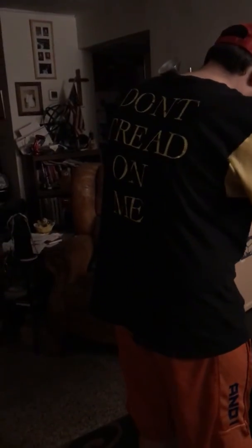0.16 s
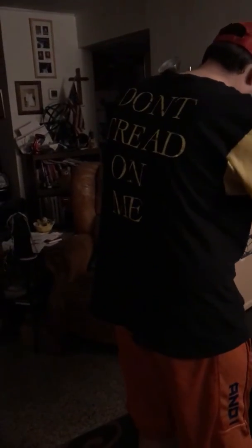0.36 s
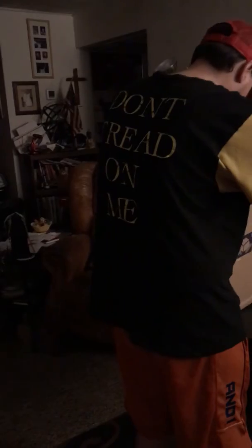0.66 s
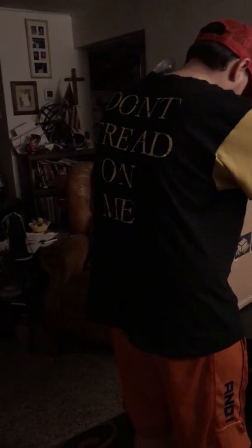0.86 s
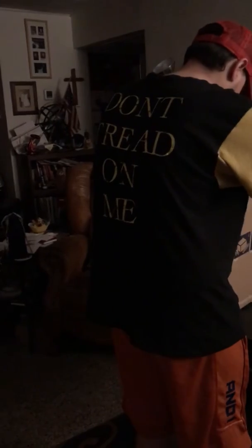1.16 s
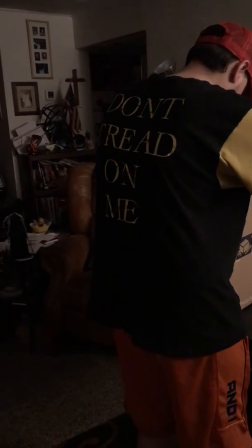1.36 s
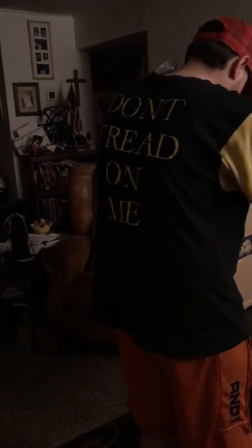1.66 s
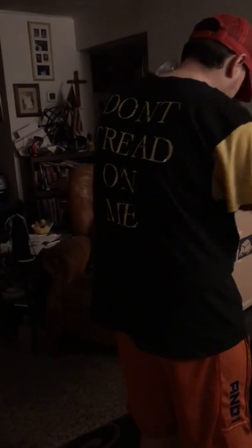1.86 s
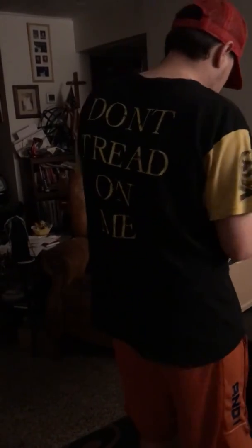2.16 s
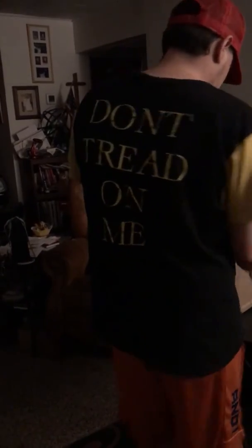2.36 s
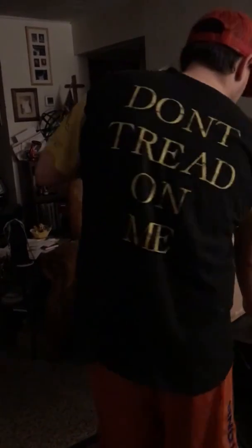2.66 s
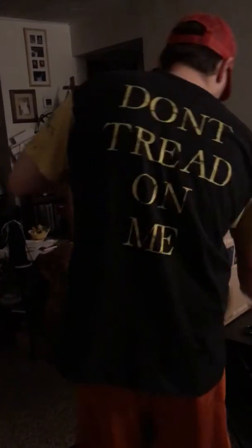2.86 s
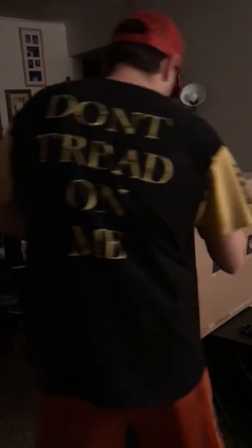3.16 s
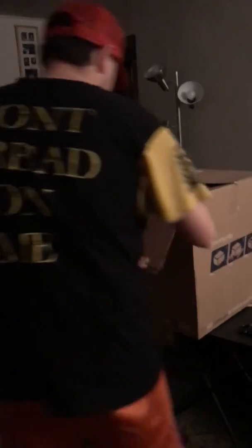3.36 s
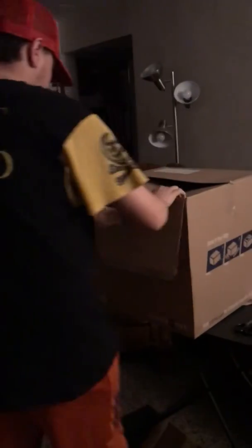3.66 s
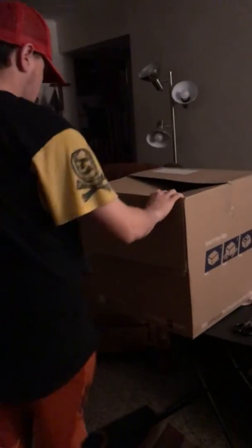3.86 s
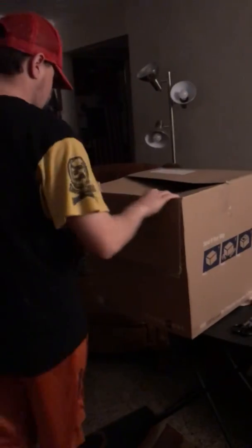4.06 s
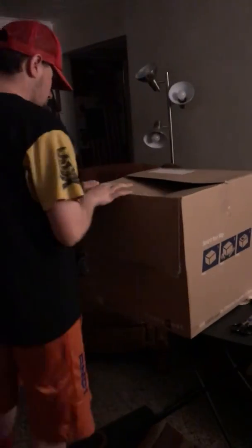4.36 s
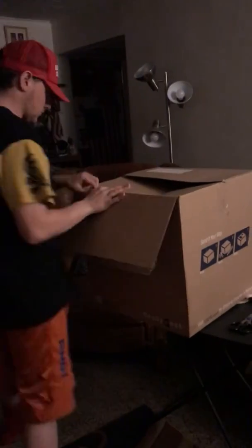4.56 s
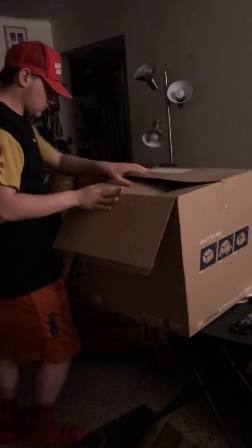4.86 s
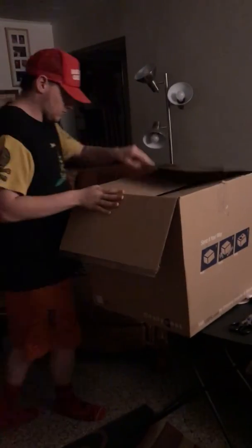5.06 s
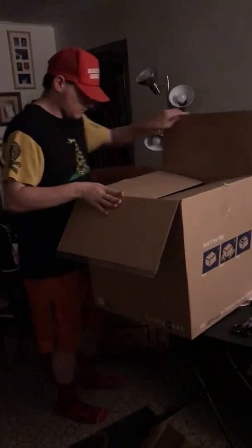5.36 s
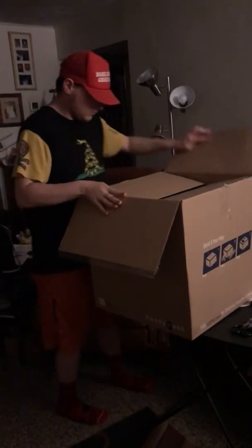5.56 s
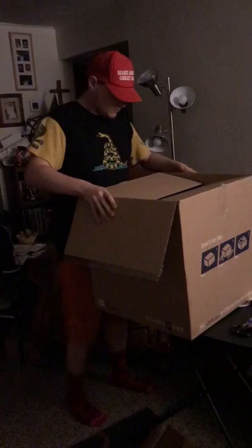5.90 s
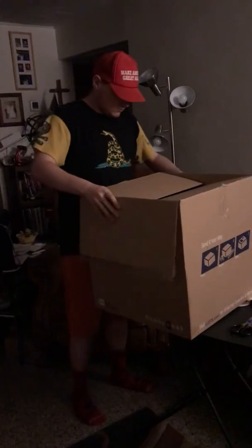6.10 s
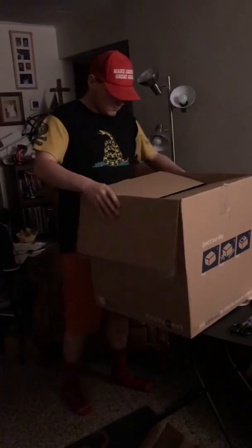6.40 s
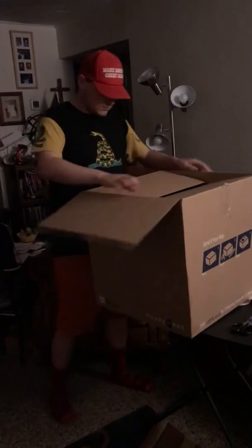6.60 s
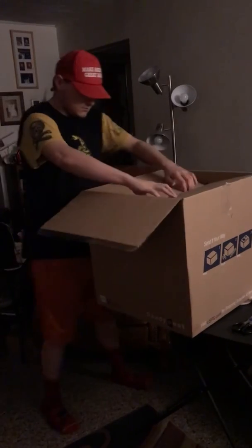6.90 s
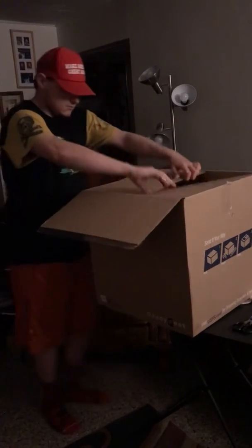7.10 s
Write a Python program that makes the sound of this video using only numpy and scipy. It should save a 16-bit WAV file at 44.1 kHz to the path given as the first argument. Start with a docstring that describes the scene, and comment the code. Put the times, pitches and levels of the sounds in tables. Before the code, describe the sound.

In a quiet furnished room, heard from a few metres off, someone opens a big cardboard box. Light rustling and ticks lead to one sharp tape snap, followed by a short burst of ripping and hollow knocking with a deep, soft thump. The flaps then scrape, creak and bump more gently, with a second soft thump, and finish on a louder knock. A faint low appliance hum continues throughout.

```python
"""Hands open the flaps of a large cardboard box, a few metres away in a furnished living room.
Palms rub and bend the board, and flaps knock on the hollow box, making it ring.
Fibres crack, glue ticks, creases creak as they stick and slip, and one tight tape end snaps.
Two deep, soft thumps swell and fade. Behind it all, an appliance hums under the hush of the room."""
import sys
import numpy as np
from scipy import signal
from scipy.fft import rfft, irfft
from scipy.io import wavfile
from scipy.ndimage import uniform_filter1d

SR = 44100
rng = np.random.default_rng(int(sys.argv[2]) if len(sys.argv) > 2 else 0)


def store_pcm(level_fs):
    """Save levels as 16-bit WAV."""
    pcm = np.round(np.clip(level_fs, -1, 1) * 32767).astype(np.int16)
    wavfile.write(sys.argv[1], SR, np.atleast_2d(pcm).T)


N = 319151
T = np.arange(N) / SR

# Hand strokes. Each row: strongest moment in seconds, time to swell by 20 dB in ms,
# time to fade by 20 dB in ms, rubbing level in dB, hiss compared with the rubbing in dB.
STROKES = [(.184, 110, 420, -57.5, -5), (.522, 160, 113, -54.5, -0.5), (.832, 48, 74, -50.5, 0.5),
           (1.55, 140, 1100, -64.5, -2), (1.803, 12, 40, -60, -18), (1.935, 27.5, 58, -58.5, 7.5),
           (2.478, 44, 430, -71, -3.5), (3.267, 340, 57, -56.5, -1.5), (3.409, 64, 190, -61, -6),
           (3.564, 120, 370, -62, -5.5), (3.984, 340, 270, -63.5, -10), (4.2, 260, 83, -57, -10),
           (4.632, 53, 73, -42, -4), (4.84, 290, 455, -51, -2.5), (4.975, 1000, 40, -61.5, -6),
           (5.09, 70, 400, -62.5, 2), (5.38, 410, 470, -56.5, -8.5), (5.615, 67, 290, -47.5, -3),
           (5.7, 300, 300, -57, 8), (5.95, 430, 130, -56.5, -2), (6.17, 76, 270, -57.5, -3.5),
           (6.389, 57, 48, -57, -4), (6.55, 210, 210, -55, -2.5), (7.15, 430, 100, -53.5, -4.5),
           (7.198, 38.4, 360, -29.5, -1)]
# The tone of skin on cardboard. Each row: frequency in Hz, relative level in dB.
RUB_TONE = [(120, -27.5), (230, -6), (584, -13), (1380, -7), (4350, -12.5), (7000, -19), (9100, -59.5)]
# The board bends. Each row: time in seconds, rumble level in dB before hand pressure scales it.
FLEXING = [(0.0, -56), (0.36, -58.5), (1.13, -58.5), (2.64, -71), (2.9, -35), (3.0, -62), (4.03, -55),
           (4.51, -75), (5.14, -54.5), (6.07, -68), (6.31, -55), (6.77, -67.5), (7.07, -54), (7.24, -59.5)]
# Notes of the box's panels and air. Each row: pitch in Hz, relative level in dB, seconds to fade 60 dB.
BOX_MODES = [(88, 4.5, 0.1246), (122.9, 5, 0.18), (168, -3.5, 0.021), (244.6, 6.5, 0.11),
             (294.6, 1.5, 0.11), (385.6, -7.5, 0.027), (550, -1, 0.013), (619.7, -1.5, 0.1),
             (708, -4, 0.049), (1060, -4.5, 0.03), (1310, -7.5, 0.055), (1660, -16, .04)]
# Blows on the box. Each row: start in seconds, level in dB, panel pitch in Hz, push length in ms.
KNOCKS = [(0.175, -49, 348, 11), (0.28, -44.5, 261, 27), (0.502, -28.5, 240, 23), (0.532, -33.5, 137, 25),
          (1.35, -22.5, 245, 30), (1.373, -27, 123.8, 40), (2.72, -11.5, 234.4, 25), (2.757, -22, 263, 4.6),
          (2.775, -14, 462, 8.3), (2.784, -12, 260, 12), (2.806, -23, 317, 12), (2.819, -28, 247, 24),
          (2.862, -15, 306, 18), (2.88, -16, 250, 24.7), (2.92, -21, 236, 26), (3.23, -38, 248, 45),
          (3.422, -39.5, 110.3, 60), (3.5, -44.5, 112.7, 47), (3.662, -44, 216, 45), (3.789, -43, 235, 27),
          (3.915, -36.5, 120.7, 45), (3.964, -38, 228, 23), (4.167, -39.5, 216, 21),
          (4.272, -38.5, 279, 11), (4.88, -39, 123, 32), (4.922, -41, 156, 17), (4.959, -39, 164, 62),
          (5.346, -36.5, 267, 13.2), (5.678, -38, 119, 26), (6.137, -40, 283, 12), (6.165, -25.5, 169, 40),
          (6.199, -30.5, 246, 16), (6.44, -43.5, 238.7, 18), (6.858, -39, 123, 46), (6.926, -27.5, 296, 23),
          (6.944, -35.5, 105, 37), (7.199, -24.5, 270, 12), (7.21, -12.5, 252.4, 27)]
# Fibres, creases and tape give way. Each row: start in seconds, level in dB, extra treble in dB,
# fade time in ms.
CRACKS = [(0.108, -46, -8, 7.4), (.157, -42, -4.5, 32), (0.453, -38.5, -9, 10.5), (0.506, -31.5, -7, 7.6),
          (0.764, -53.5, 12.5, 6.3), (0.782, -62, 24, 8.7), (.82, -57, 20, 11), (1.136, -54.5, 4, 6),
          (1.8, -43, -5, 7.7), (1.936, -39, -11, 3.1), (2.112, -41, -6.5, 3.1), (2.153, -51, -1, 3),
          (2.28, -51.5, 8.5, 1), (2.488, -59.5, 15, 3.7), (2.717, -21, -5.5, 5.4),
          (2.7545, -19.5, 0.5, 4.5), (2.770, -11.5, 0.5, 11.6), (2.864, -21, -0.5, 10), (3.55, -47, -5, 24),
          (4.603, -37.5, -0.5, 5.3), (6.157, -26, -15.5, 6.7), (6.226, -35.5, -8.5, 2.7),
          (6.922, -33.5, -13, 11.5), (7.199, -17.5, -25, 12), (7.217, -17.5, -3, 8.3)]
# Notes of the tape end. Each row: pitch in Hz, relative level in dB, seconds to fade 60 dB.
TAPE_MODES = [(9250, 7, 0.008), (9700, 7.5, .003), (7300, -1.5, .0015), (5700, 1.5, 0.0055),
              (2340, -13, 0.0013)]
# The tape's snap and its two quick echoes off nearby surfaces. Each row: delay in ms, level in dB.
SNAP_ECHOES = [(0, 4), (6.6, -8), (8.6, -6)]
# Glue lets go. Each row: start in seconds, level in dB, fade time in ms.
GLUE_TICKS = [(.331, -51, 5), (.587, -42.5, 6.5), (.805, -34, 6), (1.904, -45, 1.5), (2.056, -48, 5),
              (3.791, -48, 9.9), (5.12, -38, 3)]
# Creases creak. Each row: start in seconds, level in dB, pitch in Hz, length in ms.
CREAKS = [(0.168, -41, 1370, 20), (.282, -49, 2260, 15), (1.6, -53, 2059, 20), (1.73, -53.5, 1450, 39),
          (2.177, -51, 1526, 12), (3.669, -46, 1020, 36), (4.631, -39.5, 1550, 32), (5.098, -40, 1100, 14),
          (5.22, -44, 2960, 14.4), (5.562, -47.5, 1300, 31), (5.605, -42, 3200, 20), (5.635, -47, 1580, 25),
          (6.109, -51.5, 1501, 55), (7.092, -35.5, 1080, 14)]
# Thin tones of a sliding palm. Each row: pitch in Hz, band width in Hz, level in dB.
WHINE_BANDS = [(4280, 450, -75), (5320, 350, -76)]
# Deep, soft thumps. Each row: start in seconds, level in dB, pitch in Hz.
DEEP_THUMPS = [(2.78, -33, 98), (6.171, -39.5, 50.3)]
# The room's echo tail. Each row: band centre in Hz, seconds to fade 60 dB, relative level in dB.
ROOM_TAIL = [(130, 0.16, -1), (594, 0.25, 2), (2400, 0.35, -3), (8960, .28, -6.5)]
# Early echo off a wall. Each row: delay in ms, relative level in dB.
WALL_ECHOES = [(10, -23.5)]
# The tone of the room's air. Each row: frequency in Hz, relative level in dB.
HUSH_TONE = [(18, -39), (30, -11.5), (127, -3.5), (295, -2), (461, -16), (702, -12.5), (4420, -24),
             (10500, -28), (16000, -32)]
# The appliance's hum. Each row: pitch in Hz, level in dB.
HUM_TONES = [(118.4, -64.5), (150.7, -70.5)]

PALM_DAMPING_S = 0.016  # a palm on the board shortens its ring


def hands():
    """Skin slips over the paper grain in fits; the bent board rumbles more under a harder press."""
    rubbing, hissing = stroke_strength()
    slips = colour(grains(10000, 2.0), RUB_TONE)
    rub = level(slips, 0) * rubbing * undb(3.1 * walk(60))
    fine_slips = band(grains(14000, 1.5), 6100, 21000)
    hiss = level(fine_slips, 0) * hissing * undb(2.7 * walk(37))
    bending = undb(np.interp(T, *np.transpose(FLEXING)))
    pressure = (rubbing / np.median(rubbing)) ** 0.28
    return rub + hiss + bending * pressure * board_flex()


def stroke_strength(resting_db=-80):
    """Each stroke presses harder, then eases. Gives the strength of the rub and of the hiss over time."""
    s, swell_ms, fade_ms, db, hiss_db = np.transpose(STROKES)[:, :, None]
    t = T[::64]
    shape_db = -20 * 1000 * np.where(t < s, (s - t) / swell_ms, (t - s) / fade_ms)
    resting = undb(resting_db) ** 2  # fingers that only hold the board
    rub_power = np.sum(undb(db + shape_db) ** 2, axis=0) + resting
    hiss_power = np.sum(undb(db + hiss_db + 1.12 * shape_db) ** 2, axis=0) + resting
    return np.interp(T, t, np.sqrt(rub_power)), np.interp(T, t, np.sqrt(hiss_power))


def board_flex(grip_s=0.09):
    """Small bends ring the box under the palms; each new grip shifts its notes."""
    bends, step = grains(600, 1.2), int(grip_s * SR)
    out = np.zeros(N + SR)
    for i in range(0, N, step):
        grip, gains = rng.standard_normal((2, len(BOX_MODES)))
        body = ring(gripped_modes(grip), gains, seconds=0.05)
        body *= np.exp(-T[:len(body)] / PALM_DAMPING_S)
        rumble = signal.fftconvolve(bends[i:i + step], body)
        out[i:i + len(rumble)] += rumble
    return level(radiate(out[:N]), 0)


def knocks(contact_ms=1.5, overtone_power=0.14):
    """A flap or knuckle pushes a panel, which swings and soon stops; the short tap adds overtones."""
    out, t = np.zeros(N), T[:SR // 10]
    modes_hz = np.array(BOX_MODES)[:, 0]
    tap = arch(t * 1000 / contact_ms) ** 2
    for s, db, hz, ms in KNOCKS:
        chance, grip = rng.standard_normal((2, len(BOX_MODES)))
        modes = gripped_modes(grip)
        push = arch((t * 1000 / ms) ** 0.7) * np.sin(2 * np.pi * hz * t)
        damping = np.exp(-t * 1000 / (0.14 * ms))
        panel = signal.fftconvolve(damping * ring(modes, undb(1.2 * chance))[:len(t)], push)
        gains = chance * np.minimum(modes_hz / (2 * hz), 1) ** 2  # the tap favours higher notes
        tap_ring = ring(modes, gains)[:len(t)] * np.exp(-t / PALM_DAMPING_S)
        overtones = signal.fftconvolve(tap_ring, tap)
        knock = level(panel, 0) + np.sqrt(overtone_power) * level(overtones, 0)
        add(out, s, radiate(knock), db)
    return out


def gripped_modes(grip, detune=0.12):
    """A grip moves each note of the box a little up or down."""
    modes = np.array(BOX_MODES)
    modes[:, 0] *= np.exp(detune * grip)
    return modes


def radiate(x, low_hz=119):
    """Air slips around a loose panel and cancels its deep bass."""
    return signal.sosfilt(signal.butter(2, low_hz, "highpass", fs=SR, output="sos"), x)


def fibre_cracks(tick_ms=0.95):
    """A quick burst of tearing: dull through the board, bright straight from the fibres."""
    out, t_ms = np.zeros(N), T[:4000] * 1000
    for s, db, treble_db, ms in CRACKS:
        noise = rng.standard_normal((4, len(t_ms)))
        fade = np.exp(-t_ms / ms)
        rise = 1 - np.exp(-t_ms / (0.49 * ms + 0.22))
        low, middle, high = noise[:3] * fade * rise
        add(out, s, band(low, 410, 850) + 0.5 * band(middle, 730, 2200), db)
        add(out, s, band(high, 2500, 6500), db + treble_db)
        tick = noise[3] * (np.exp(-t_ms / tick_ms) + 0.34 * fade)  # the first fibre breaks
        add(out, s, band(tick, 6500, 16000), db - 4 + 1.2 * treble_db)
    return out


def tape_snap(snap_s=1.3558, stretch_ms=9.2):
    """The tape crackles louder as it stretches, then snaps with a brief ring and two quick echoes."""
    out, t = np.zeros(N), T[:600]
    rise = np.linspace(0, 1, int(stretch_ms * SR / 1000)) ** 0.64
    crackle = band(rng.standard_normal(len(rise)), 344, 11000) * rise
    add(out, snap_s - stretch_ms / 1000, crackle, db=-18)
    ping = ring(TAPE_MODES, np.ones(len(TAPE_MODES)), seconds=0.02)
    click = t == 0
    for ms, db in SNAP_ECHOES:
        rip = 0.12 * rng.standard_normal(len(t)) * np.exp(-t / 0.0053)
        add(out, snap_s + ms / 1000, ping, db)
        add(out, snap_s + ms / 1000, band(click + rip, 520, 11000), db - 10.5)
    return out


def glue_ticks():
    """Glue lets go in short, thin bursts of treble."""
    out, t_ms = np.zeros(N), T[:2000] * 1000
    for s, db, ms in GLUE_TICKS:
        burst = rng.standard_normal(len(t_ms)) * np.minimum(t_ms, 1) * np.exp(-t_ms / ms)
        add(out, s, band(burst, 5100, 17000), db)
    return out


def crease_creaks():
    """A crease sticks and slips unevenly: a rough squeak that swells and fades."""
    out, t_ms = np.zeros(N), T[:4000] * 1000
    for s, db, hz, ms in CREAKS:
        slips = rng.standard_normal(len(t_ms)) * arch(t_ms / ms)
        add(out, s, band(slips, 0.9 * hz, 1.11 * hz), db)
    return out


def palm_whine(start_s=3.64, end_s=4.26):
    """A slowly sliding palm makes two thin, wavering bands of hiss."""
    out = np.zeros(N)
    for hz, width, db in WHINE_BANDS:
        hiss = band(rng.standard_normal(N), hz - width / 2, hz + width / 2)
        out += level(hiss, db) * undb(3.4 * walk(14))
    return out * arch((T - start_s) / (end_s - start_s)) ** 0.25


def deep_thumps(cycles=3.2):
    """Deep, soft thumps that swell and fade."""
    out, t = np.zeros(N), T[:8000]
    for s, db, hz in DEEP_THUMPS:
        add(out, s, arch(t * hz / cycles) * np.sin(2 * np.pi * hz * t), db)
    return out


def room(x, build_up_s=0.0045):
    """The room adds a wall echo and a dense tail that dies at its own pace in each band."""
    t, tail = T[:SR // 2], 0
    for hz, fade_s, db in ROOM_TAIL:
        echoes = band(rng.standard_normal(len(t)), hz / 2, hz * 2) * np.exp(-np.log(1000) * t / fade_s)
        band_gain = np.sqrt(np.sum(echoes ** 2) * SR / (3 * hz))
        tail = tail + undb(db) * echoes / band_gain
    tail *= np.clip(t / build_up_s, 0, 1) ** 2
    for ms, db in WALL_ECHOES:
        tail[int(ms * SR / 1000)] += undb(db)
    return x + signal.fftconvolve(x, tail)[:N]


def room_hush():
    """Room air and microphone hiss lie over the deep murmur of the house."""
    air = level(colour(rng.standard_normal(N), HUSH_TONE), db=-62.5) * undb(0.7 * walk(2.1))
    murmur = level(band(rng.standard_normal(N), 50, 77), db=-68.5) * undb(3.5 * walk(5.8))
    return air + murmur


def appliance_hum():
    """An appliance hums on two low tones that waver in loudness."""
    return sum(np.sqrt(2) * undb(db + walk(17)) * np.sin(2 * np.pi * hz * T) for hz, db in HUM_TONES)


def undb(db):
    """Turn decibels into a multiplier."""
    return 10 ** (np.asarray(db) / 20)


def level(x, db):
    """Set a sound's average (RMS) level."""
    return x * undb(db) / np.sqrt(np.mean(x ** 2))


def arch(progress):
    """Rise and fall once as progress goes from 0 to 1."""
    return np.sin(np.pi * np.clip(progress, 0, 1))


def band(x, lo_hz, hi_hz):
    """Keep the sound between two frequencies."""
    edges = [lo_hz, min(hi_hz, 0.45 * SR)]
    return signal.sosfilt(signal.butter(2, edges, "bandpass", fs=SR, output="sos"), x)


def colour(x, points):
    """Shape a long noise's tone along (Hz, dB) points."""
    hz, db = np.transpose(points)
    curve_db = np.interp(np.log(np.fft.rfftfreq(N, 1 / SR) + 1), np.log(hz), db)
    return irfft(rfft(x) * undb(curve_db), N)


def walk(rate):
    """Drift smoothly to a new random value, rate times a second."""
    hold = int(SR / rate)
    steps = np.repeat(rng.standard_normal(N // hold + 1), hold)
    return uniform_filter1d(uniform_filter1d(steps, hold), hold)[:N]


def ring(modes, gains, seconds=0.2):
    """A struck object's own notes (its modes) sound together and die away."""
    hz, db, fade_s = np.transpose(modes)[:, :, None]
    t = T[:int(seconds * SR)]
    return gains @ (undb(db) * np.exp(-np.log(1000) * t / fade_s) * np.sin(2 * np.pi * hz * t))


def add(track, s, sound, db):
    """Start a sound at s seconds, with a peak level of db."""
    i = int(s * SR)
    track[i:i + len(sound)] += (undb(db) * sound / np.abs(sound).max())[:N - i]


def grains(rate, spread_db):
    """Tiny slips: about rate clicks a second, very uneven in size."""
    return (rng.random(N) < rate / SR) * rng.standard_normal(N) * undb(spread_db * rng.exponential(size=N))


def scene():
    """The box in the room, plus the deep thumps and the background, in one channel."""
    box = hands() + knocks() + fibre_cracks() + glue_ticks() + crease_creaks() + tape_snap() + palm_whine()
    return (room(box) + deep_thumps() + room_hush() + appliance_hum())[None]


def record(dry):
    """The microphone's opening dips a narrow treble band; the highest treble is cut."""
    dip_hz, width_hz, depth, top_hz = 10430, 520, 0.62, 15800
    b, a = signal.iirpeak(dip_hz, dip_hz / width_hz, fs=SR)
    heard = dry - depth * signal.lfilter(b, a, dry)
    return signal.sosfilt(signal.ellip(10, 0.2, 70, top_hz, fs=SR, output="sos"), heard)


dry = scene()
out = record(dry)
store_pcm(out)
```